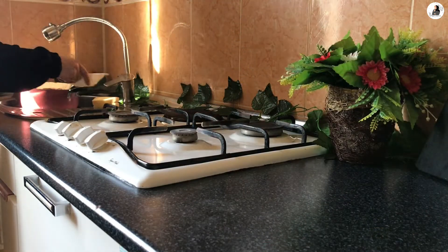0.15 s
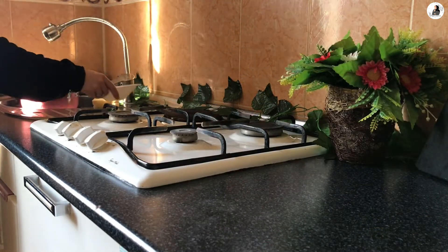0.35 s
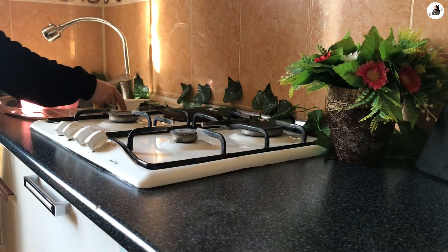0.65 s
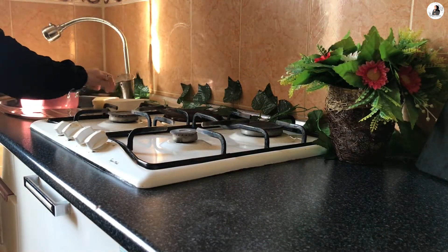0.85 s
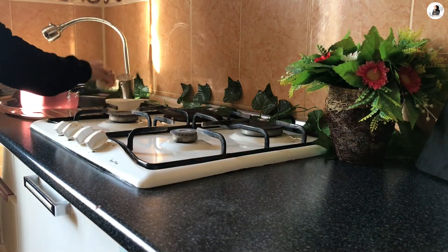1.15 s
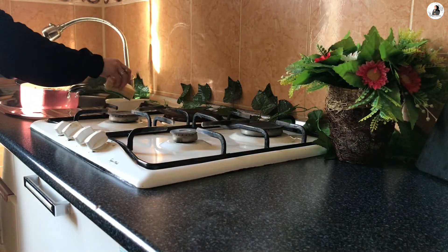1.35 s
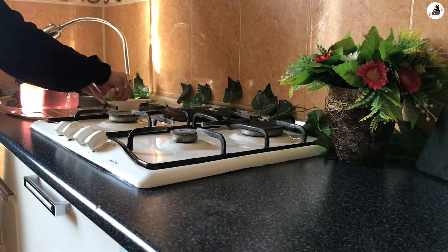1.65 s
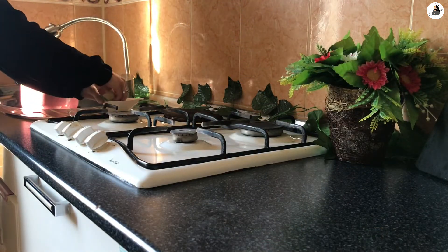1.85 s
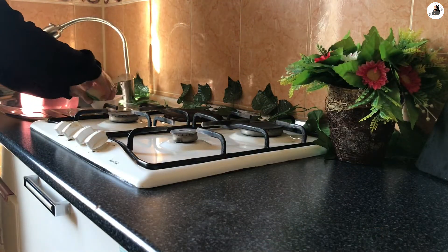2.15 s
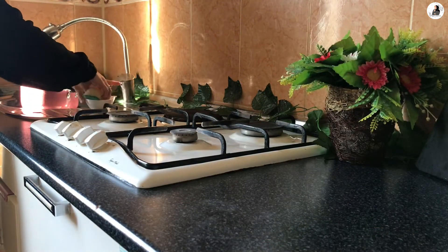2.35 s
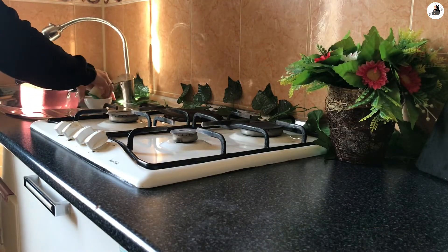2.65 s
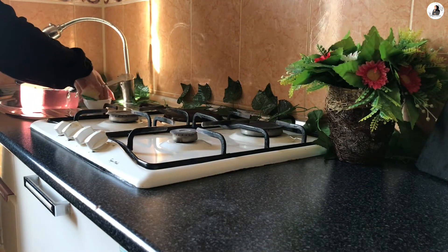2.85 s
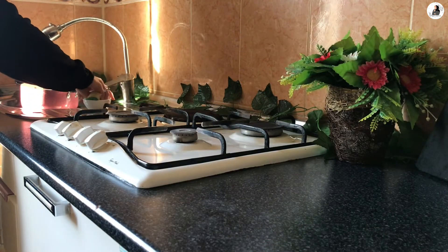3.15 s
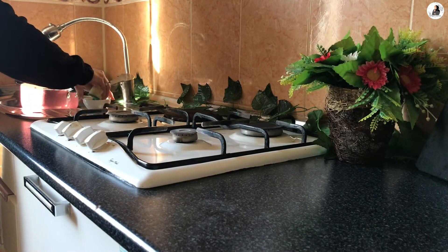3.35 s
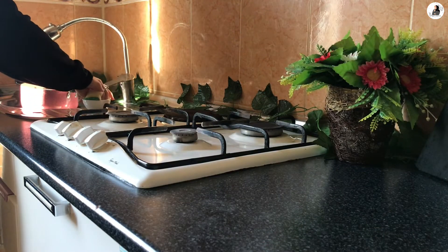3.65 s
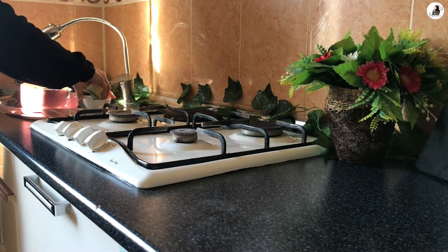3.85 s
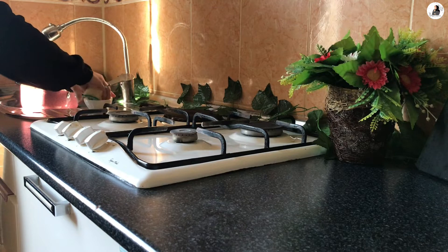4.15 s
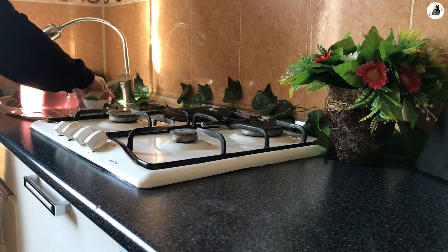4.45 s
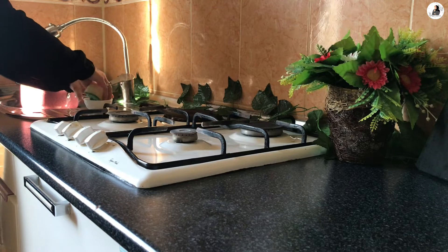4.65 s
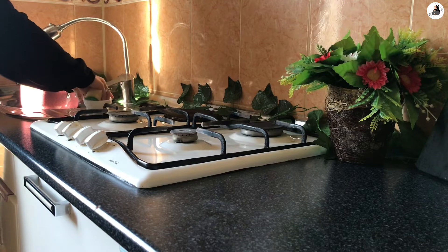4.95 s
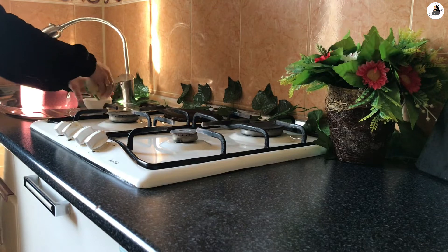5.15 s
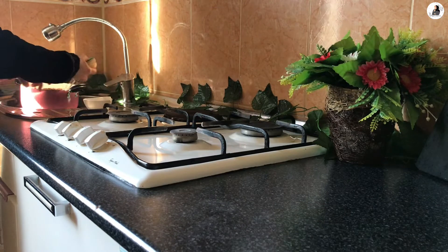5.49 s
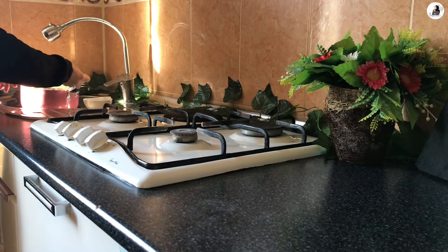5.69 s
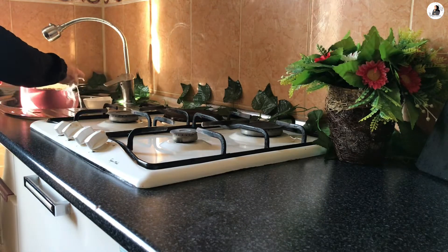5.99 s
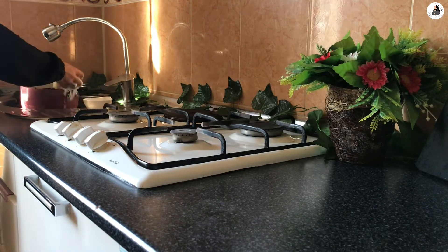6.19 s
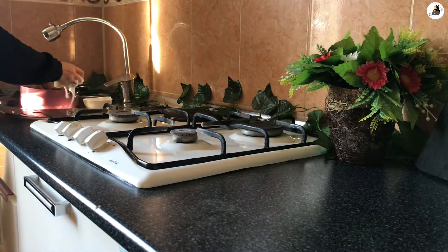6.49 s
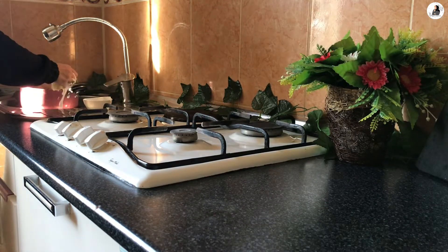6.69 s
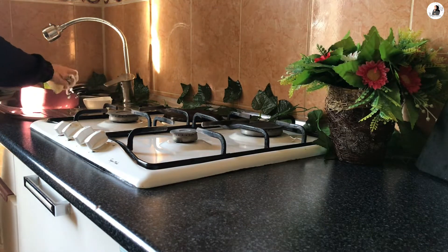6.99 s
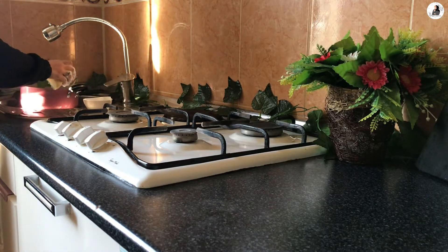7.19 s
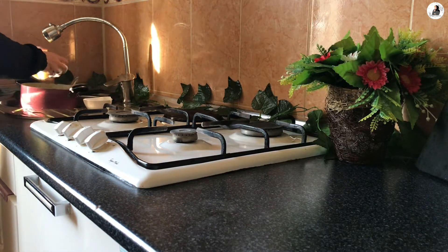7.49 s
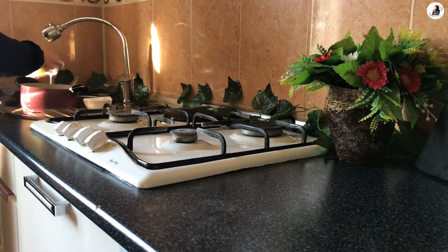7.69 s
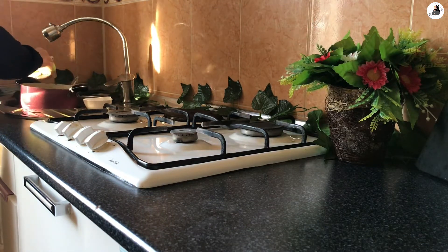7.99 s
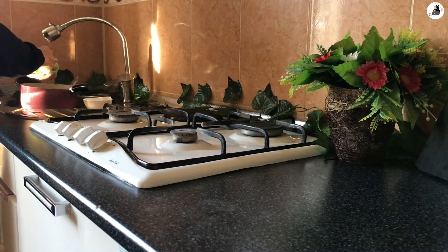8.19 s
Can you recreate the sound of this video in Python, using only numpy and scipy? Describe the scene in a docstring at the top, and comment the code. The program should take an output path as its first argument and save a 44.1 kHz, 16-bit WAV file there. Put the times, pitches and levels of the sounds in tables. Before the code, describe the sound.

Dishes knock dully in a steel kitchen sink amid soft sleeve rustling, then a lid clatters and a pot rings out in a small hard-walled room.

```python
"""First come a low room rumble, soft microphone hiss and a faint electrical tick about ten times a second.
Hands, cloth and sleeves rustle over this (noise made of tiny slips), with light touches of fingertips.
Cups and dishes knock dully in a steel sink: a crack, the basin's short ringing and a swelling thump.
Near the end a lid clatters and a pot rings out, as sums of decaying tones under short noise bursts.
The touches, knocks, bumps, lid and pot echo from the hard walls of a small kitchen."""
import sys
import numpy as np
from scipy import signal
from scipy.fft import rfft, irfft, next_fast_len
from scipy.io import wavfile
from scipy.ndimage import uniform_filter1d

SR = 44100
rng = np.random.default_rng(int(sys.argv[2]) if len(sys.argv) > 2 else 0)


def voltage_ratio(decibels):
    """Convert decibels (scalar or array-like) to amplitude ratios, 20 dB per decade."""
    exponent = np.asarray(decibels, float) / 20
    return 10 ** exponent


def master(y):
    """Save y as 16-bit WAV."""
    cut = np.clip(np.atleast_2d(y).T, -1, 1)
    pcm = np.round(cut * 32767)  # scale
    wavfile.write(sys.argv[1], SR, pcm.astype(np.int16))


N = 367353  # length in samples
T = np.arange(N) / SR  # time in seconds

# Most levels in the tables are relative: the functions below add their own offsets.
# slow course of the low room rumble: t/s, level/dB
RUMBLE_LEVEL = [(0.0, -60), (0.44, -67), (0.74, -69), (1.07, -70), (2.06, -64.5), (2.2, -59), (2.83, -77.5),
                (4.06, -67.5), (4.24, -65), (4.41, -63), (6.77, -61), (7.61, -71.5), (8.03, -61),
                (8.33, -78)]
# tone colour of the steady hiss: f/Hz, level/dB
HISS_COLOUR = [(12, -46), (20, -27), (65, 0.5), (91, -10.5), (124, -12), (179, -11), (230, -9),
               (403, -17.5), (438, -22), (668, -24), (860, -26.5), (1050, -42), (7680, -55), (15100, -31.5),
               (16400, -48)]
# strokes of hand and cloth: start t/s, length t/s, rubbing level/dB, fine rustle level/dB
STROKES = [(0.03, 0.021, -91, -77), (1.028, 0.059, -73, -75), (1.26, .12, -91, -81),
           (1.779, 0.38, -66, -74), (2.706, 0.14, -75, -79), (2.973, 0.15, -68, -77.5),
           (3.38, 0.078, -72.5, -78), (3.62, 0.063, -66, -74.5), (4.285, 0.045, -66, -81),
           (4.6, 0.11, -68, -78), (4.841, 0.11, -67.5, -82), (5.102, 0.031, -72.5, -77.5),
           (5.306, 0.028, -72, -75), (5.428, 0.34, -70.5, -75.5), (5.69, 0.031, -80, -68),
           (5.875, 0.07, -63, -64), (5.976, 0.25, -65.5, -69.5), (6.266, 0.074, -63, -68),
           (6.47, 0.13, -67, -70), (6.551, 0.048, -58, -84), (7.6, 0.014, -69, -69.5),
           (7.719, .05, -68, -71.5), (7.882, 0.059, -62.5, -65.5), (7.968, 0.032, -59.5, -66),
           (8.11, 0.23, -65, -68.5)]
# tone colour of the coarse rubbing: f/Hz, level/dB
RUB_COLOUR = [(180, -39.5), (300, -5), (405, -2), (603, -7.5), (1060, -0.5), (1150, -1), (1340, -3.5),
              (3190, -5), (16000, -27.5)]
# tone colour of the fine rustle: f/Hz, level/dB
FINE_COLOUR = [(3000, -2.5), (6000, 10), (9000, 7), (12000, 6), (16000, -0.5)]
# touches of fingertips and nails: t/s, level/dB, centre f/Hz
TAPS = [(.114, -65, 11400), (1.881, -71, 9100), (4.611, -61, 2180), (5.14, -63, 2000), (5.456, -67.5, 6000),
        (5.738, -58.5, 11000), (5.832, -62, 5640), (6.007, -56, 2600), (6.05, -61, 980),
        (6.209, -62.5, 7760), (6.582, -54.5, 2500), (7.623, -61, 2960)]
# how long the room echoes at each pitch: f/Hz, time to fall by 60 dB t/s
ROOM_T60 = [(60, 0.35), (150, 0.26), (350, 0.37), (700, 0.4), (1500, 0.48), (3500, 0.39), (7000, 0.37),
            (14000, 0.18)]
# dishes set down on the basin: t/s, plate level/dB, crack level/dB, thump f/Hz, thump level/dB
KNOCKS = [(0.6436, -30, -18.5, 119.7, -20), (1.4989, -40, -32.5, 111, -36.5),
          (2.1033, -46.5, -44.5, 128, -33.5), (2.2738, -45, -36, 117, -43), (2.829, -56, -48.5, 112, -52),
          (3.474, -55.5, -55, 128, -55.5), (4.0513, -59.5, -60, 118, -44.5),
          (4.0746, -45.5, -43.5, 152, -50), (4.1094, -55.5, -49, 151, -48), (4.2955, -75, -63, 71, -73),
          (6.051, -64, -56, 83, -56), (7.9412, -62, -75, 133.4, -52.5)]
# ringing modes of the basin: f/Hz, level/dB, time to fall by 60 dB t/s
BASIN_MODES = [(230, -10.5, 0.18), (274, -4, 0.036), (347.7, 4.5, 0.099), (417, -2.5, 0.059),
               (505, -1, 0.047), (567, 0.5, 0.087), (651.5, -11, 0.13), (733.7, -7, 0.098), (825, -9, 0.22),
               (1010, -10, 0.099), (1255, -9, 0.038)]
# soft bumps against the cabinet, thump only: t/s, f/Hz, level/dB
BUMPS = [(1.029, 128, -53), (2.526, 99.2, -43), (3.0643, 120, -58.5), (3.6874, 116, -56),
         (4.1295, 80.4, -49), (4.6945, 103, -47.5)]
# borders between the three bands of ringing in the hit tables: f/Hz
RING_BORDERS = [1400, 3500]
# blows on the lid: t/s, clatter level/dB, then ring level/dB in the low, middle and high band
LID_HITS = [(6.632, -74, -52.5, -74, -82.5), (6.655, -28.5, -45, -32.5, -44), (6.685, -32, -54, -45, -47.5),
            (6.74, -12.5, -40, -30, -31), (6.825, -23, -38.5, -36, -47), (6.975, -38, -50, -46, -62)]
# ringing modes of the lid: f/Hz, level/dB, time to fall by 60 dB t/s
LID_MODES = [(586, 3, .12), (661, -5.5, 0.24), (785, -11.5, 0.11), (1038, -1.5, 0.15), (1188, -5.5, 0.12),
             (1544, -13.5, 0.092), (1753, 0, 0.09), (2000, -15.5, 0.029), (2320, -3, .1), (2600, -2, 0.12),
             (3260, -8.5, 0.083), (3730, -8, 0.34), (4180, -1.5, .1), (4670, -4.5, 0.086), (5320, -3, 0.17),
             (5880, -6.5, 0.13), (6220, 9.5, 0.015), (6530, 3, 0.073), (7130, -2.5, 0.089),
             (7600, -9, 0.077), (8830, -9, 0.11), (9200, -9, 0.061), (10420, -14.5, .06),
             (12240, -7.5, .05)]
# blows on the pot: t/s, clatter level/dB, then ring level/dB in the low, middle and high band
POT_HITS = [(7.1075, -24, -34, -48, -32.5), (7.111, -18, -36.5, -45.5, -27.5),
            (7.1164, -16.5, -40.5, -46.5, -40.5), (7.1316, -14.5, -16.5, -21, -35.5),
            (7.1371, -9.5, -18.5, -31, -31), (7.1504, -18.5, -30.5, -43.5, -41.5),
            (7.1804, -17.5, -32, -39.5, -33), (7.222, -9, -40, -42.5, -33)]
# ringing modes of the pot: f/Hz, level/dB, time to fall by 60 dB t/s
POT_MODES = [(566, -12, 0.57), (657, 3.5, 0.17), (725, -9, 0.22), (793, -13.5, 0.13), (990, -19, .3),
             (1082, -3.5, 0.55), (1080, -16, 0.19), (1146, -4.5, 0.42), (1198, -3, 0.55),
             (1710, -8.5, 0.074), (1827, -3, 0.13), (1922, -3, .3), (2090, -20, 0.78), (2550, -7.5, 0.34),
             (2883, -5.5, 0.22), (3272, -4.5, 0.16), (3520, -18.5, 0.17), (4085, -4, 0.2), (4590, -3, 0.11),
             (5250, -4, 0.17), (5400, -7, 0.17), (5860, -8, 0.2), (6235, 4, 0.042), (6550, -1, 0.096),
             (6740, -1.5, 0.1084), (8220, 3, 0.064), (9370, 0.5, 0.036), (9830, 0, 0.11),
             (11170, -7, 0.051), (11800, -11.5, 0.04)]
# dips in the response of the microphone port: centre f/Hz, width f/Hz, level/dB
MIC_DIPS = [(25, 12, -4.5), (4876, 230, -2.5), (7650, 610, -2.5), (10500, 700, -4)]

TICK_FIRST_S, TICK_EVERY_S = 0.0357, 0.1024
REST_RUB_DB, REST_FINE_DB = -76, -78.5  # sleeves never quite rest
STROKE_ATTACK_S, STROKE_T60_S = 0.023, 0.72
STROKE_SWELL = 0.16  # share of the stroke's length that is added to its attack
THUMP_T60_S, THUMP_RISE_S = 0.11, 0.0088


def curve(table, column):
    """One column of a table, joined in time with rounded corners."""
    points = np.array(table)
    return uniform_filter1d(np.interp(T, points[:, 0], points[:, column]), size=800)


def unit(x):
    """Scale to rms 1."""
    return x / np.sqrt(np.mean(x ** 2))


def colour(x, spectrum):
    """Filter a sound so that its pitches follow (f/Hz, level/dB) points."""
    size = next_fast_len(len(x))
    hz, db = np.transpose(spectrum)
    log_f = np.log(np.fft.rfftfreq(size, 1 / SR) + 1)
    gain = voltage_ratio(np.interp(log_f, np.log(hz), db))
    return irfft(rfft(x, size) * gain, size)[:len(x)]


def band(x, lo_hz, hi_hz):
    """Causal band-pass."""
    edges = np.clip([lo_hz, hi_hz], 20, 0.45 * SR)
    return signal.sosfilt(signal.butter(2, edges, "band", fs=SR, output="sos"), x)


def walk(rate):
    """Random levels held for 1 / rate seconds, then smoothed twice and scaled to rms 1."""
    hold = int(SR / rate)
    steps = np.repeat(rng.standard_normal(N // hold + 1), hold)
    smooth = uniform_filter1d(uniform_filter1d(steps, hold), hold)
    return unit(smooth[:N])


def fade(t, t60):
    """Exponential decay that falls by 60 dB in t60 seconds (at least 0.01 s)."""
    return np.exp(-np.log(1000) * t / np.maximum(t60, 0.01))


def add(track, s, sound):
    """Mix a sound into the track at time s."""
    i = int(s * SR)
    track[i:i + len(sound)] += sound[:N - i]


def background():
    """Steady hiss, a wavering low rumble and an electrical tick made of evenly spaced, filtered clicks."""
    hiss = unit(colour(rng.standard_normal(N), HISS_COLOUR)) * voltage_ratio(-65.5)
    rumble_db = curve(RUMBLE_LEVEL, 1) + 3 * walk(31)
    rumble = unit(band(rng.standard_normal(N), 52, 120)) * voltage_ratio(rumble_db)
    clicks = np.zeros(N)
    clicks[(np.arange(TICK_FIRST_S, N / SR, TICK_EVERY_S) * SR).astype(int)] = 1
    return hiss + rumble + voltage_ratio(-42) * band(clicks, 12000, 16000)


def strokes(column, rest_db):
    """Strength of the rubbing: each stroke rises and, once its length is over, dies away; powers add."""
    power = voltage_ratio(rest_db) ** 2
    for row in STROKES:
        start_s, length_s = row[:2]
        t = T - start_s
        rise = np.clip(t / (STROKE_ATTACK_S + STROKE_SWELL * length_s), 0, 1)
        shape = rise * fade(np.maximum(t - length_s, 0), STROKE_T60_S)
        power = power + (voltage_ratio(row[column]) * shape) ** 2
    return np.sqrt(power)


def rustle():
    """Cloth and wet fingers: dense tiny slips of uneven strength, coarse in the middle and fine at the top."""
    unevenness = np.minimum(rng.exponential(size=(2, N)), 7)
    slips = rng.standard_normal((2, N)) * voltage_ratio(2.4 * unevenness)
    rub = unit(colour(slips[0], RUB_COLOUR)) * strokes(column=2, rest_db=REST_RUB_DB)
    fine = unit(colour(slips[1], FINE_COLOUR)) * strokes(column=3, rest_db=REST_FINE_DB)
    # both flicker in level, each on its own
    return rub * voltage_ratio(1.2 * walk(30)) + fine * voltage_ratio(1.8 * walk(30))


def burst(t, length_s):
    """A brief contact of unit energy: decaying noise with the peaks and holes of its spectrum flattened."""
    even = rng.standard_normal(len(t))
    for _ in range(2):
        spectrum = rfft(even * np.exp(-t / length_s))
        even = irfft(spectrum / np.abs(spectrum), len(t))
    even = even * np.exp(-t / (4 * length_s))
    return unit(even) / np.sqrt(len(t))


def taps():
    """Light touches: short noise bursts, each about two octaves wide."""
    out = np.zeros(N)
    for s, db, hz in TAPS:
        touch = burst(T[:SR // 8], 0.011)
        add(out, s, voltage_ratio(db + 28) * band(touch, 0.44 * hz, 1.8 * hz))
    return out


def room(x, build_s):
    """Dense echo of the tiled walls: noise whose decay time depends on pitch, drawn anew at each call."""
    t, tail = T[:SR * 3 // 4], 0
    hz, t60 = np.transpose(ROOM_T60)
    for centre in 62.5 * 2 ** np.arange(0, 8.5, 0.5):  # half-octave bands
        part = band(rng.standard_normal(len(t)), centre / 2 ** 0.25, centre * 2 ** 0.25)
        tail = tail + part * fade(t, np.interp(np.log(centre), np.log(hz), t60))
    spectrum = rfft(tail * (1 - np.exp(-t / build_s)))
    # many overlapping modes: no broad band of pitches is favoured
    power = uniform_filter1d(np.abs(spectrum) ** 2, size=45)
    tail = irfft(spectrum / np.sqrt(power), len(t)) * (t < 0.6)
    # walls and air take treble at once
    dull = colour(x, [(60, 4.0), (2500, -1.0), (7000, -3), (12000, -6), (16000, -8.0)])
    return signal.fftconvolve(dull, unit(tail) / np.sqrt(len(t)))[:N]


def ring(modes, db, t, scatter_db, split, rise_s, chatter):
    """All modes start at the blow; each has two weaker partials close by, as in dented, hand-held ware."""
    hz, mode_db, t60 = np.transpose(modes)[:, :, None]
    gain = voltage_ratio(mode_db + db + scatter_db * rng.standard_normal((len(hz), 1)))
    detune, sign = rng.standard_normal((2, 2, len(hz), 1))
    # loose contact keeps jolting the phase, which blurs each mode over chatter times its pitch
    jolt_size = np.sqrt(2 * np.pi * abs(chatter) * hz / SR)
    jolts = jolt_size * np.cumsum(rng.standard_normal((len(hz), len(t))), axis=1)
    phase = 2 * np.pi * hz * t + jolts
    main = np.sign(sign[0] * detune[0]) * np.sin(phase)
    partials = np.sign(sign) * np.sin(phase * (1 + split * detune))
    cluster = main + 0.63 * np.sum(partials, axis=0)
    return np.sum(gain * fade(t, t60) * cluster, axis=0) * (1 - np.exp(-t / rise_s))


def thump(hz, db, t, t60):
    """The basin's lowest mode swells in; the cabinet under it answers lower, with its own decay."""
    swell = voltage_ratio(db + 12.5) * (1 - np.exp(-t / THUMP_RISE_S))
    basin = fade(t, t60) * np.sin(2 * np.pi * hz * t)
    cabinet = voltage_ratio(-18.5) * fade(t, 0.085) * np.sin(2 * np.pi * 0.84 * hz * t)
    return -swell * (basin + cabinet)


def knocks():
    """A crack of contact and the basin's modes, each blow with its own echo; thumps swell in just after."""
    out, thumps, t = np.zeros(N), np.zeros(N), T[:SR // 3]
    for s, plate_db, crack_db, hz, thump_db in KNOCKS:
        grit, push = burst(t, 0.012), burst(t, 0.0083)
        crack = voltage_ratio(crack_db + 23) * (band(grit, 760, 3920) + voltage_ratio(-12) * band(grit, 1130, 11000))
        plate = ring(BASIN_MODES, plate_db - 3.5, t, scatter_db=2.5, split=0.05, rise_s=0.0019, chatter=0.041)
        # the low push lies between plate and thump in level
        low_push_db = plate_db + 0.36 * (thump_db - plate_db) + 38
        low_push = voltage_ratio(low_push_db) * band(push, 172, 480)
        mid_push = voltage_ratio(plate_db + 38.5) * band(push, 400, 1490)
        blow = crack + plate + low_push + mid_push
        add(out, s, blow)
        add(out, s, room(voltage_ratio(5.5) * blow, build_s=0.00045))
        add(thumps, s + 0.0024, thump(hz, thump_db, t, THUMP_T60_S))
    return out, thumps


def bumps():
    """Soft bumps against the cabinet: the thump alone, without crack or plate."""
    out = np.zeros(N)
    for s, hz, db in BUMPS:
        add(out, s + 0.0032, thump(hz, db + 2.5, T[:SR // 3], t60=0.074))
    return out


def metal(hits, modes, clatter_s, split, stifle, chatter, low_hz, high_hz):
    """Each blow stifles part of the earlier ringing and starts it anew, band by band, under a brief clatter."""
    rings, clatter, t = np.zeros(N), np.zeros(N), T[:SR * 3 // 4]
    group = np.searchsorted(RING_BORDERS, np.array(modes)[:, 0])  # low, middle or high band of each mode
    for s, clatter_db, *bands_db in hits:
        rings *= 1 - stifle * np.clip((T - s) / 0.00077, 0, 1)
        ring_db = np.array(bands_db)[group][:, None]
        add(rings, s, ring(modes, ring_db, t, scatter_db=0.0, split=split, rise_s=0.002, chatter=chatter))
        add(clatter, s, voltage_ratio(clatter_db + 6) * band(burst(t, clatter_s), low_hz, high_hz))
    # small ware radiates no bass
    return band(band(rings, 430, 19000), 430, 19000), clatter


def lid():
    """The lid: modes strongly blurred by loose contact, with a broad clatter."""
    return metal(LID_HITS, LID_MODES, clatter_s=0.0083, split=0.015, stifle=0.4, chatter=0.023,
                 low_hz=704, high_hz=10100)


def pot():
    """The pot: clearer modes, with a shorter and brighter clatter."""
    return metal(POT_HITS, POT_MODES, clatter_s=0.0039, split=0.012, stifle=0.59, chatter=0.008,
                 low_hz=2600, high_hz=15860)


def scene():
    """All sources with their echoes, over the background; each place in the room has its own echo."""
    touches = taps()
    blows, knock_thumps = knocks()
    thumps = band(knock_thumps + bumps(), 62, 840)
    lid_ring, lid_clatter = lid()
    pot_ring, pot_clatter = pot()
    # how strongly each place feeds its echo
    sink = voltage_ratio(-7) * thumps + voltage_ratio(2.5) * touches
    lid_place = voltage_ratio(-1.0) * lid_ring + voltage_ratio(10) * lid_clatter
    pot_place = voltage_ratio(-2.5) * pot_ring + voltage_ratio(7.5) * pot_clatter
    echo = sum(room(x, build_s=0.00052) for x in (sink, lid_place, pot_place))
    ware = lid_ring + lid_clatter + pot_ring + pot_clatter
    return (background() + rustle() + touches + blows + thumps + ware + echo)[None]


def low_pass(x):
    """Removes everything above the highest recorded frequency."""
    return signal.sosfilt(signal.butter(12, 16530, fs=SR, output="sos"), x)


def record(dry):
    """The microphone port weakens a few ranges of pitch, each a bell-shaped dip."""
    size = next_fast_len(N)
    hz = np.fft.rfftfreq(size, 1 / SR)
    dips = voltage_ratio(sum(db * np.exp(-((hz - f) / width) ** 2) for f, width, db in MIC_DIPS))
    mix = irfft(rfft(dry, size) * dips, size)[:, :N]
    return low_pass(mix)


dry = scene()
out = record(dry)
master(out)
```